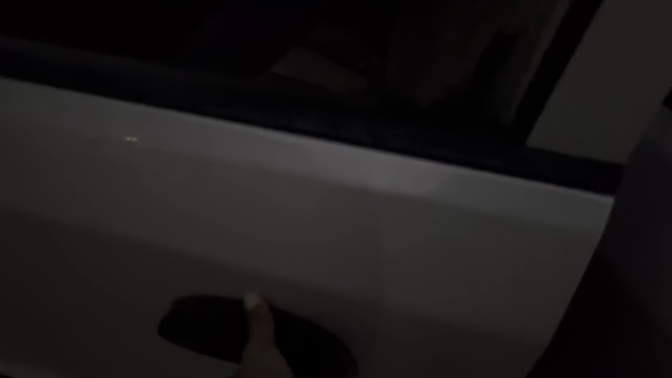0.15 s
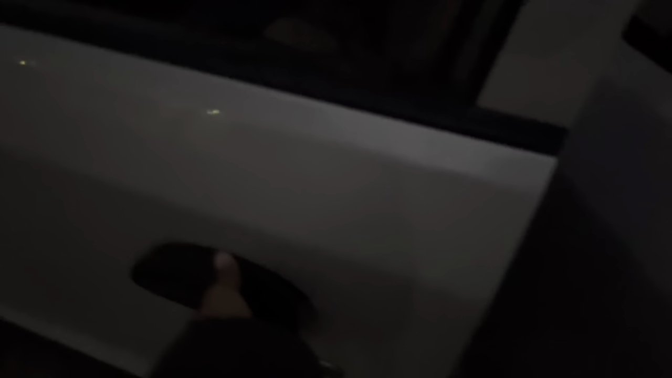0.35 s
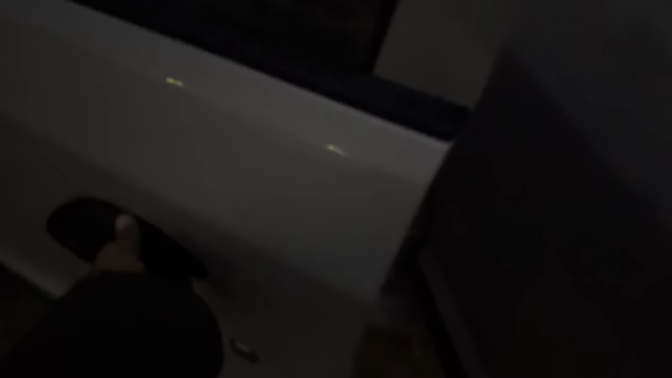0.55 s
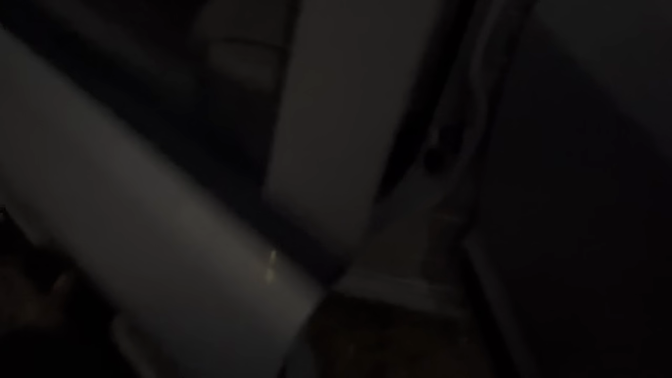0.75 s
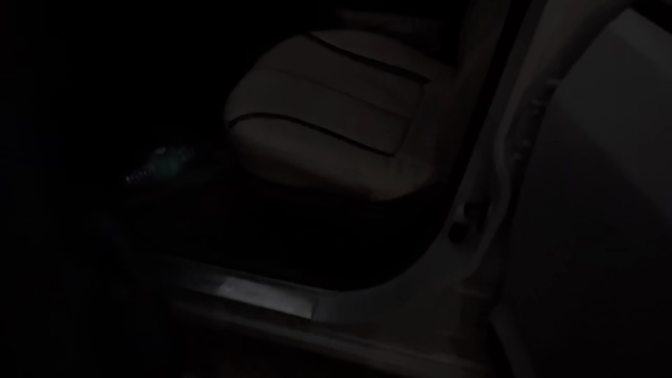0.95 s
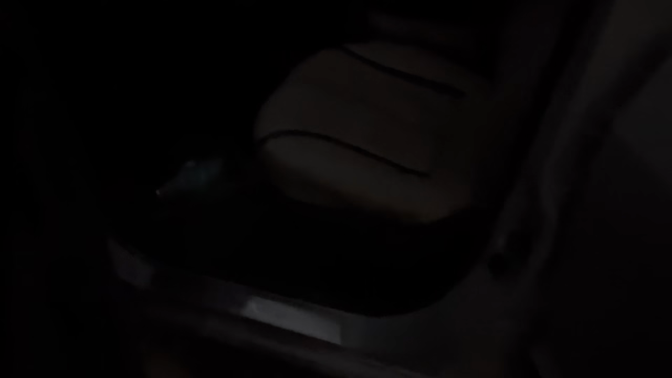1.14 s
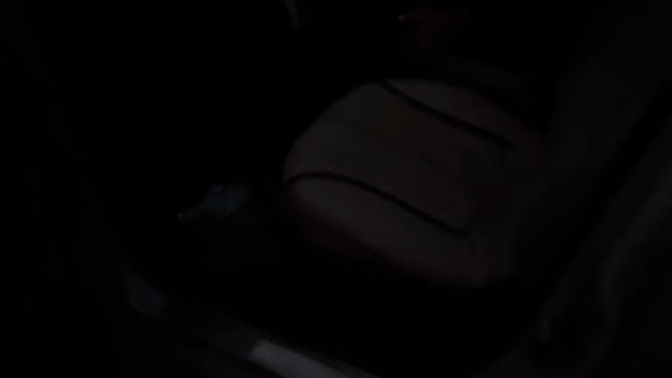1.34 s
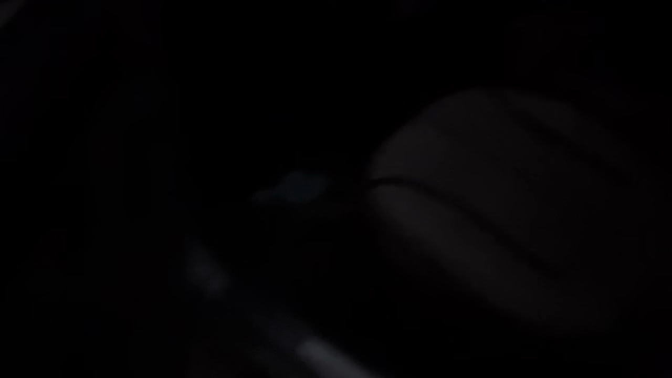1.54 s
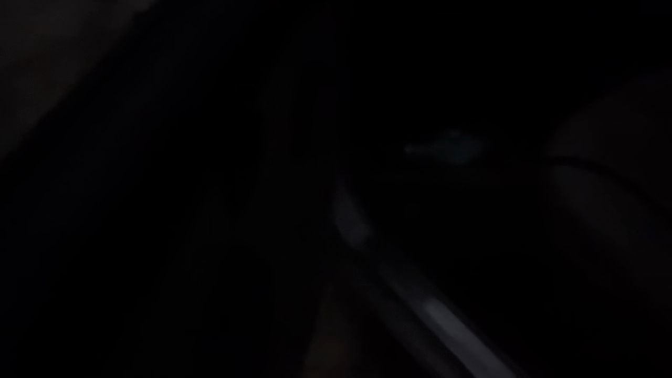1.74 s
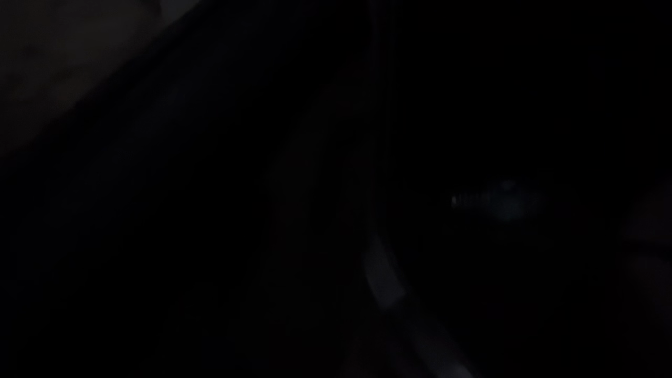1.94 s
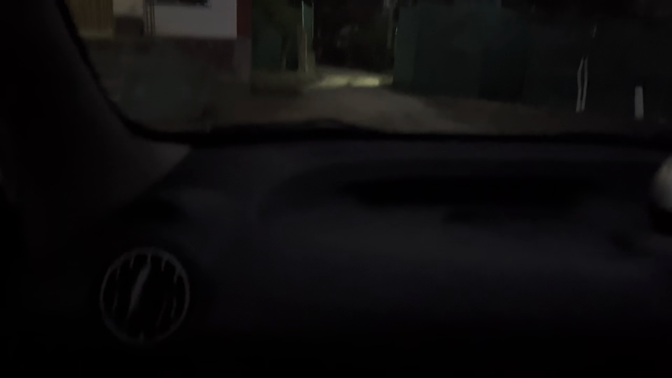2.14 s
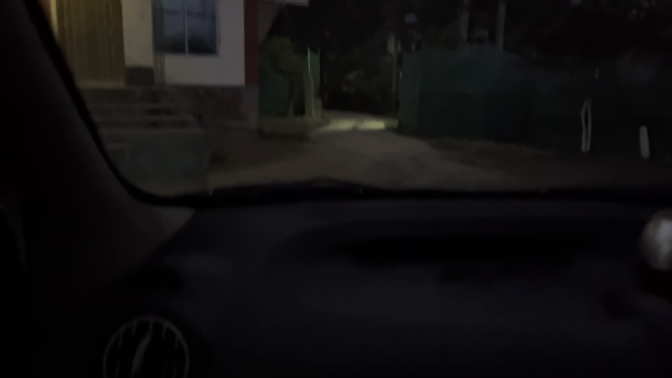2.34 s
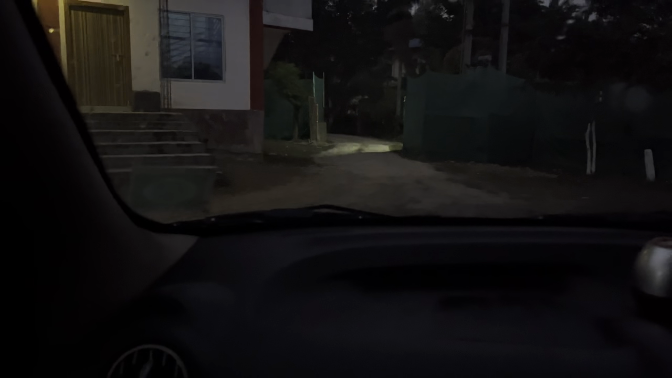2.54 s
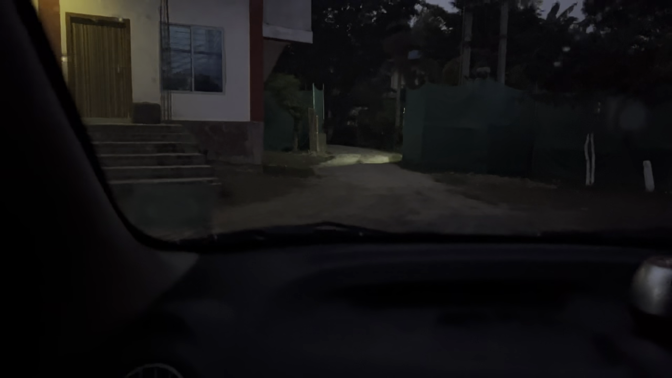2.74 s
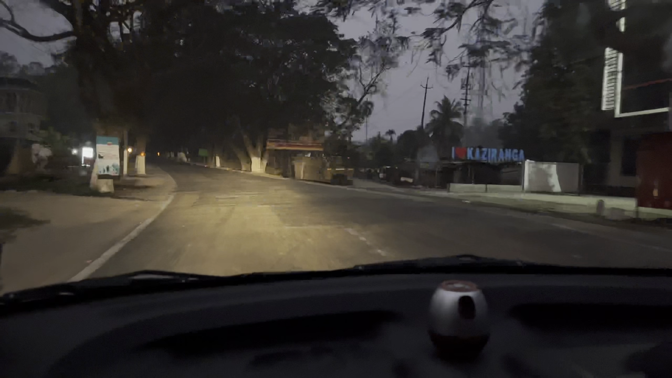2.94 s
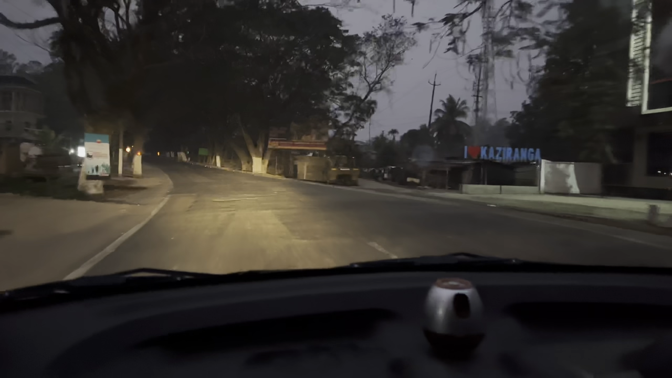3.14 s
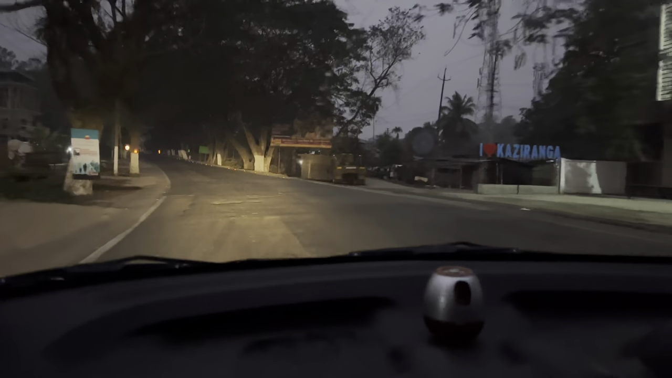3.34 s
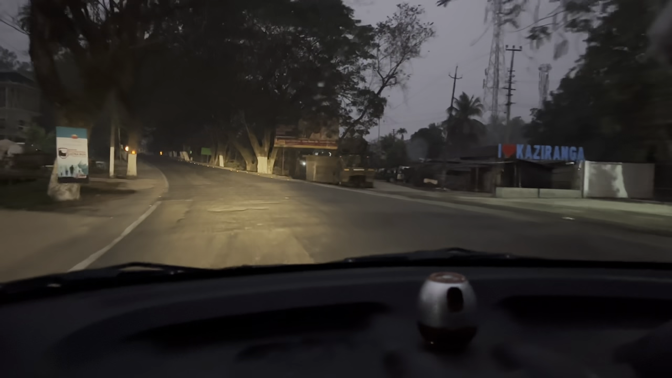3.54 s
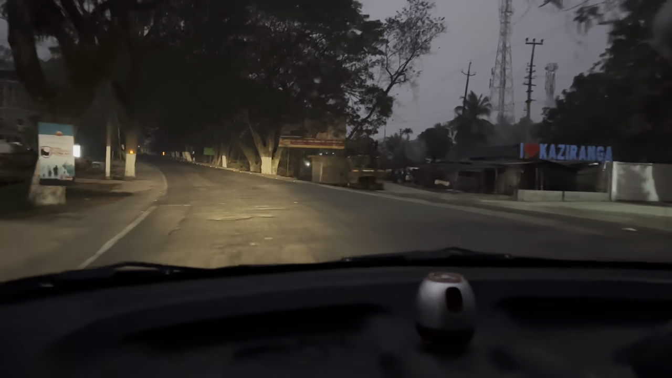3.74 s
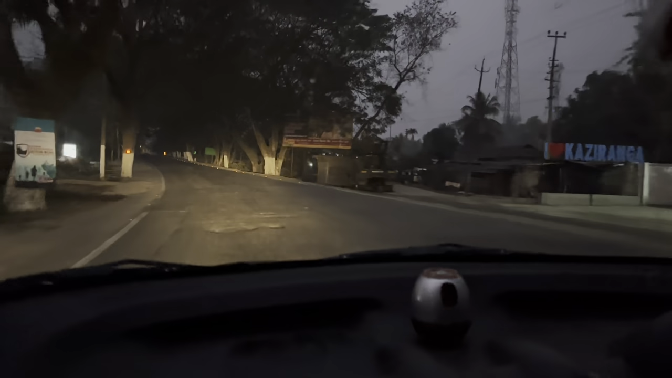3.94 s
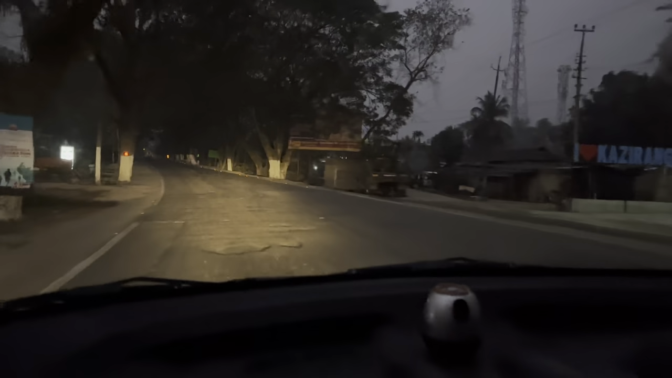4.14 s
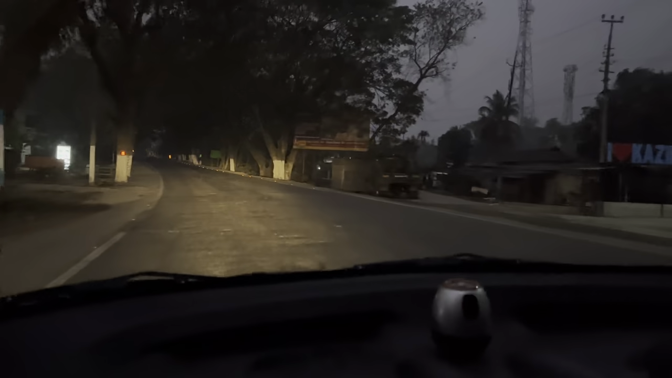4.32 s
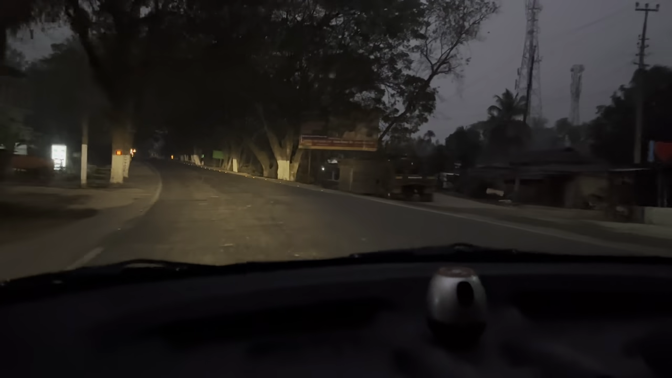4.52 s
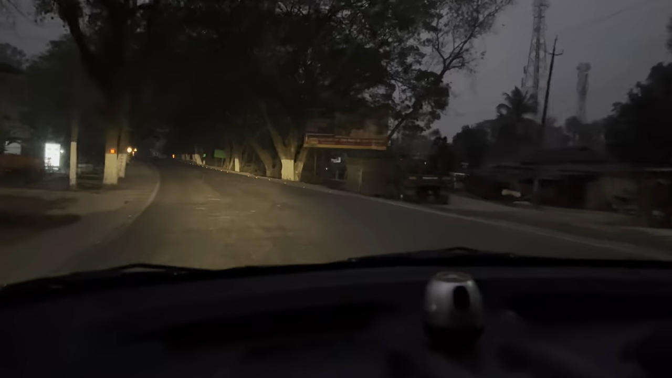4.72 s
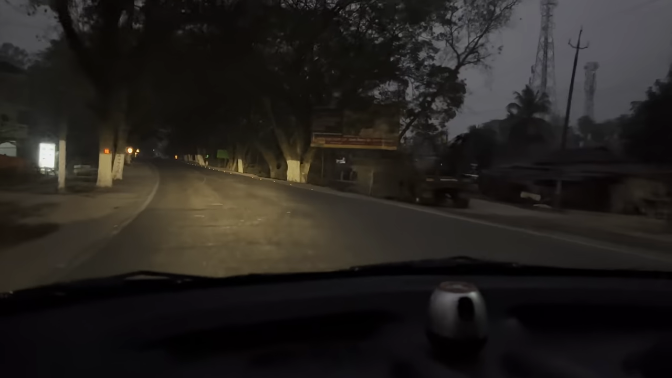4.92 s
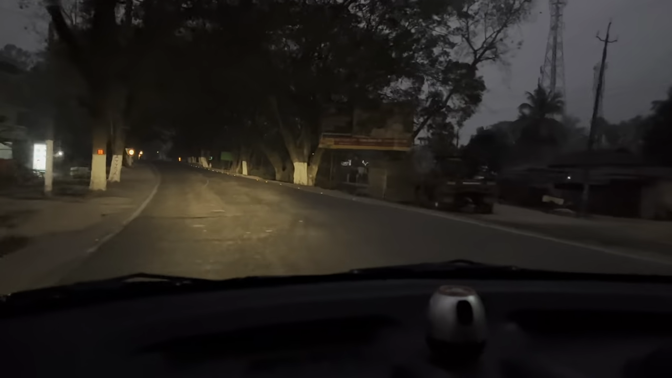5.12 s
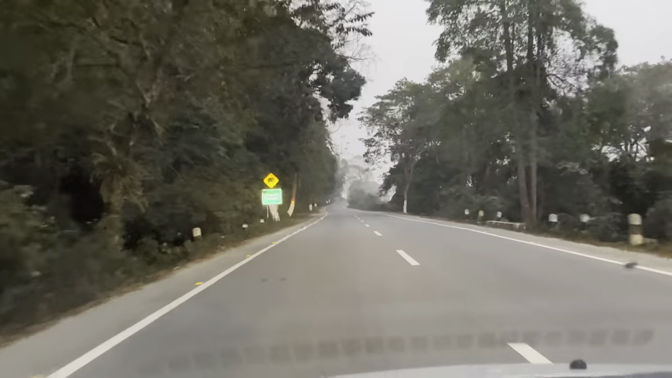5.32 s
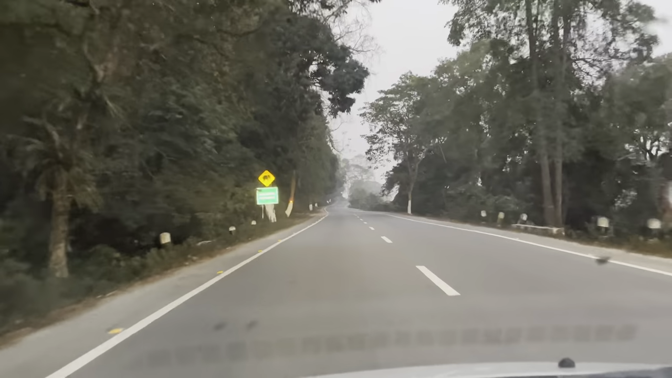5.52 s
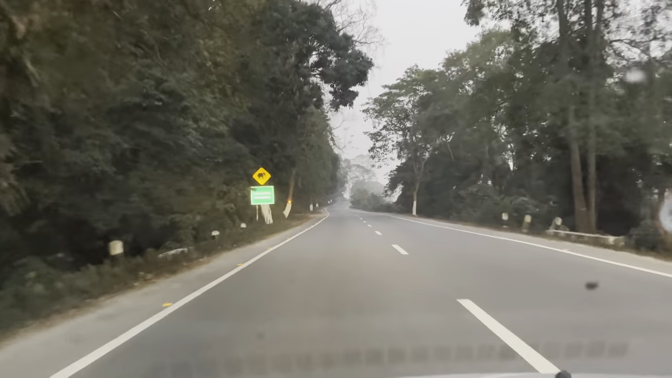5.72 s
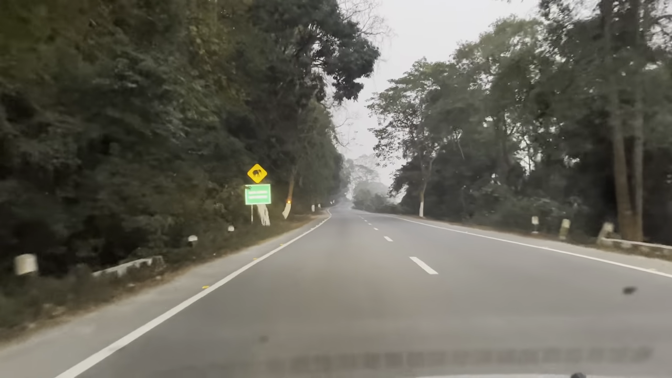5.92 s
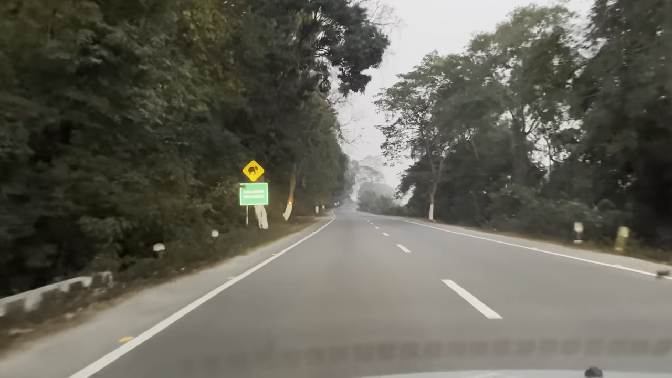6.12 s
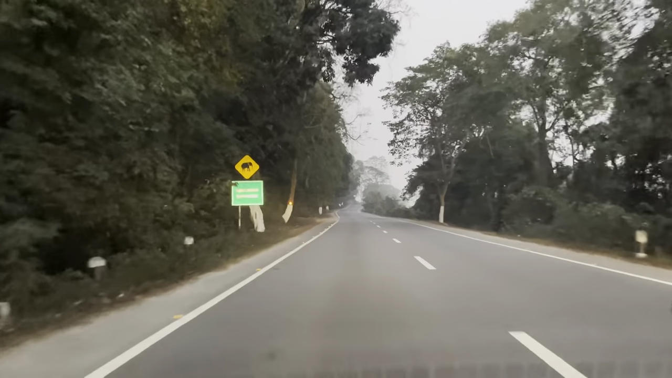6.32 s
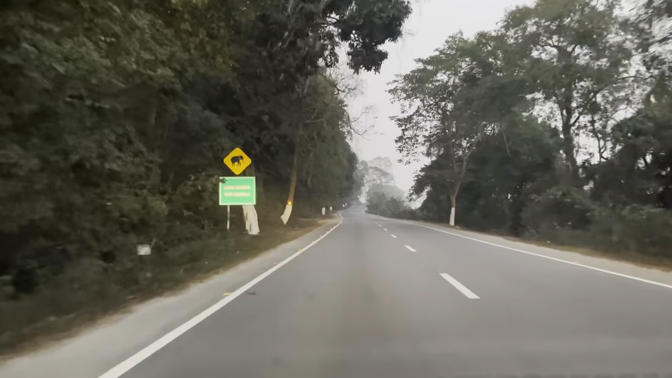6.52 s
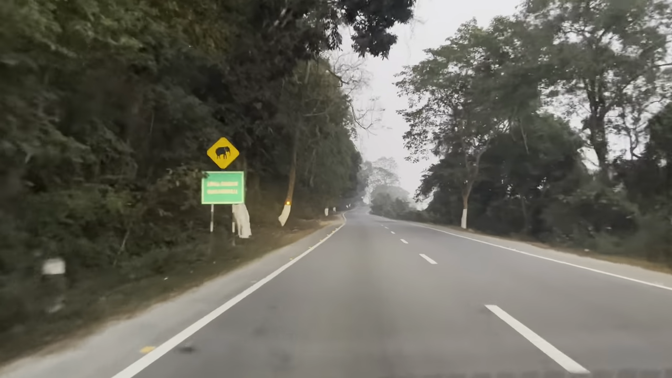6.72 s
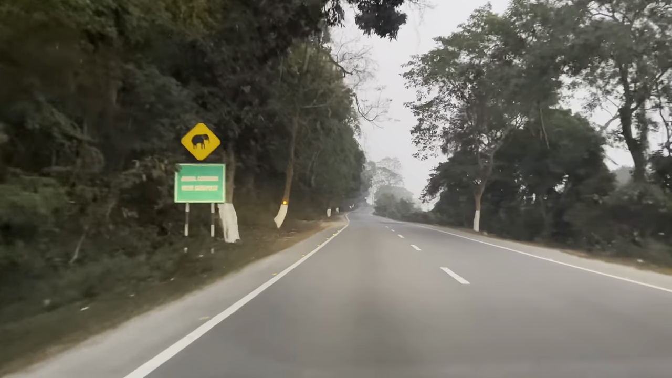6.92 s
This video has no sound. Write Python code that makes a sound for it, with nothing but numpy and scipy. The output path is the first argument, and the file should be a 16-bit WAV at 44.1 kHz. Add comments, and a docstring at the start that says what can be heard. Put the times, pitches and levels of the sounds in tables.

```python
"""Beside a parked car, then in its cabin: a handle is pulled, the latch lets go and a door bangs.
Someone drops into the seat amid rustling cloth and the door slams close on the left.
From inside, the car then rumbles over a patched road, its trim rattling on the bumps;
after an abrupt change it cruises faster, with more tyre roar and wind.
Blows ring tuned modes and noise bands; cloth, tyres and air are coloured noise; the engine is sines."""
import sys
import numpy as np
from scipy import signal
from scipy.fft import rfft, irfft, next_fast_len
from scipy.io import wavfile
from scipy.ndimage import uniform_filter1d

SR = 44100
rng = np.random.default_rng(int(sys.argv[2]) if len(sys.argv) > 2 else 0)


def generate_wav(sig):
    """Save sig (samples, or channels by samples) to the path in sys.argv[1] as 16-bit PCM at SR."""
    pcm = np.round(np.clip(np.atleast_2d(sig).T, -1, 1) * 32767).astype(np.int16)
    wavfile.write(sys.argv[1], SR, pcm)


N = 307068
DRIVE_S, HIGHWAY_S = 2.964, 5.271   # where the patched road and the highway begin
TIME = np.arange(N) / SR
PADDED = next_fast_len(N, real=True)
BINS = np.maximum(np.arange(PADDED // 2 + 1) * SR / PADDED, 1)   # Hz

# Spread over the microphone's two ports. Each row: frequency in Hz, side minus mid in dB.
WIDTH = [(40, -21.5), (70, -22), (125, -11), (250, -9), (500, -1.5), (1000, -0.5), (2000, 0.5), (4000, 0),
         (12000, -3.5)]
# Balance of the two ports. Each row: frequency in Hz, left minus right in dB.
LEFT_DB = [(50, -1.5), (250, 1.5), (500, 1.5), (1000, 2.5), (2000, -1.5), (4000, 4), (8000, 0.1)]
# Colour of roar and hiss on the patched road. Each row: frequency in Hz, relative density in dB per Hz.
PATCHED_HIGH = [(88, -34.5), (150, 3.5), (204, -10.5), (243, -11), (364, -14.5), (515, -26), (787, -30),
                (1320, -32), (1670, -40), (1910, -37.5), (3090, -45), (3340, -46.5), (8410, -65.5),
                (12600, -64), (15000, -87.5)]
# Tyre roar, then wind hiss, on the patched road.
# Each row: level at its start in dB, gain in dB per second, share of the roughness (ratio).
PATCHED_LAYERS = [(-32, .5, 0.31), (-59.5, 1.5, 0.29)]


def from_db(db):
    """Decibels to gain."""
    return 10 ** (np.asarray(db) / 20)


def rms(x):
    """Root mean square."""
    return np.sqrt(np.mean(x ** 2) + 1e-20)


def in_time(rows):
    """Each column of a curve at every sample."""
    s, *columns = np.transpose(rows)
    return [np.interp(TIME, s, c) for c in columns]


def at_hz(points, hz):
    """Read a table along log frequency."""
    f, value = np.transpose(points)
    return np.interp(np.log(hz), np.log(f), value)


def after(s, fade):
    """Goes from 0 to 1 around time s."""
    return np.clip((TIME - s) / fade + .5, 0, 1)


def drift(rate):
    """Slow chance with rms 1, weak above the rate in Hz."""
    slow = irfft(rfft(rng.standard_normal(PADDED)) / (1 + (BINS / rate) ** 2), PADDED)[:N]
    return slow / rms(slow)


def swells(rows, still_db):
    """Bell-shaped swells (middle s, half length s, dB) over a steady background, as a gain."""
    bells = sum(from_db(db) ** 2 * np.exp(-((TIME - s) / half) ** 2) for s, half, db in rows)
    return np.sqrt(from_db(still_db) ** 2 + bells)


def below(hz):
    """Gain of a steep low-pass."""
    return 1 / np.sqrt(1 + (BINS / hz) ** 10)


def above(hz):
    """Gain of the matching high-pass."""
    return np.sqrt(1 - below(hz) ** 2)


def resonant(peaks):
    """Gain of a few resonances (Hz, width Hz, dB) along frequency."""
    return from_db(sum(db / (1 + (2 * (BINS - hz) / width) ** 2) for hz, width, db in peaks))


def ports(mid, side, hz, width=WIDTH, left_db=LEFT_DB):
    """Left and right share the mid; the side spreads them apart by frequency."""
    side = side * from_db(at_hz(width, hz))
    lean = from_db(at_hz(left_db, hz) / 2)
    return np.array([(mid + side) * lean, (mid - side) / lean])


def coloured(spectrum, band, shape, width, left_db):
    """Stereo noise of a given colour, its mid scaled to rms 1 inside the band."""
    mid, side = rfft(rng.standard_normal((2, PADDED))) * from_db(at_hz(spectrum, BINS)) * shape
    inside = irfft(mid * (BINS > band[0]) * (BINS < band[1]), PADDED)
    return irfft(ports(mid, side, BINS, width, left_db), PADDED)[:, :N] / rms(inside)


def noise(spectrum, band, shape=1):
    """Coloured noise with the general spread of the two ports."""
    return coloured(spectrum, band, shape, WIDTH, LEFT_DB)


def wall_ripple():
    """Reflections between the windows leave fine peaks and dips, as a gain for mid and side."""
    ripple_db, spacing_hz = 2.34, 70   # the ripple deepens towards the treble
    knots = np.arange(0, SR / 2, spacing_hz)
    heights = np.clip(rng.standard_normal((2000, 2))[:len(knots)], -2, 2).T
    curves = np.array([np.interp(BINS, knots, h) for h in heights])
    return from_db(ripple_db * BINS / (BINS + 400) * curves)


def road_noise(spectrum, band, shape=1):
    """Coloured noise as it fills the cabin, rippled by reflections."""
    # Spread of the road over the ports. Each row: frequency in Hz, side minus mid in dB.
    road_width = [(40, -23), (70, -22.5), (125, -14), (250, -6.5), (480, -0.5), (620, 1), (770, 0),
                  (1000, 1), (1400, 7), (2100, 0), (3000, 0.5), (4500, -1), (7000, -1.5), (8500, 4.5),
                  (11500, -10.5)]
    # Its balance. Each row: frequency in Hz, left minus right in dB.
    road_left_db = [(80, 0), (230, 3.5), (430, 0), (780, 1.5), (920, 2), (1250, .5), (2000, -0.1),
                    (3300, .5), (5200, 6), (7000, .5), (9500, -2), (12000, 0)]
    return coloured(spectrum, band, shape * wall_ripple(), road_width, road_left_db)


def clicks(times, sizes, size=N):
    """One impulse for each event."""
    out = np.full(size, 1e-18)
    np.add.at(out, np.clip(np.round(times * SR).astype(int), 0, size - 1), sizes)
    return out


def smooth(x, seconds):
    """One-pole lag."""
    r = np.exp(-1 / (seconds * SR))
    return signal.lfilter([1 - r], [1, -r], x)


def ring(x, hz, t60):
    """A unit click sets a decaying sine of starting height about 1 ringing."""
    r, w = from_db(-60 / (t60 * SR)), 2 * np.pi * hz / SR
    return signal.lfilter([0, np.sin(w)], [1, -2 * r * np.cos(w), r * r], x)


def uneven(db, spread_db):
    """Strengths for mid and side, each scattered in level and pushing either way."""
    shape = (len(db), 2)
    return from_db(db + rng.normal(0, spread_db, shape).T) * rng.choice([-1, 1], shape).T


def snaps(rows, modes, count, bounce_s, loss_db):
    """A small stiff part is struck and bounces; each touch rings its modes with new strengths."""
    s, db = np.transpose(rows)
    touch = np.arange(count)
    times = (s[:, None] + bounce_s * touch * rng.uniform(.7, 1.3, (len(s), count))).ravel()
    db = (db[:, None] - loss_db * touch).ravel()
    out = 0
    for hz, level, t60 in modes:
        blows = np.array([clicks(times, size) for size in uneven(db + level, 0.97)])
        out = out + ports(*ring(blows, hz, t60), hz)
    return out


def strength(contacts, hz):
    """How hard each contact drives one frequency, in dB: between its panel, clack and tick levels."""
    hardness = 0.37   # this share of the gap from clack to tick lifts or lowers the very top
    s, tick, clack, panel = np.transpose(contacts)
    top = tick + hardness * np.clip(tick - clack, -20, 20)
    log_hz = np.log([300, 1000, 4500, 12000])
    return np.array([np.interp(np.log(hz), log_hz, row) for row in zip(panel, clack, tick, top)])


def struck(contacts, modes, colour, modes_db, length, rise_s, tail_db, tail_tilt_db, tail_length, grain_db):
    """Contacts ring a body's main modes, and its crowded ones as noise bands whose lows rise later."""
    # How fast a contact dies, before the body's length factor. Each row: frequency in Hz, t60 in seconds.
    contact_decay = [(100, 0.64), (400, 0.26), (1000, 0.13), (3000, 0.12), (7000, 0.032), (14000, 0.062)]
    times = np.array(contacts)[:, 0]
    start = max(int(times.min() * SR), 0)
    size = min(int((times.max() + .7) * SR), N) - start
    times, span = times - start / SR, slice(start, start + size)
    white = rng.standard_normal((2, 2, N))[..., span]
    chatter = grain_db * drift(300)[span]   # small loose parts touch again and again
    out, edges = np.zeros((2, N)), np.geomspace(90, 16000, 16)   # about half-octave bands
    for k, (low, high) in enumerate(zip(edges, edges[1:])):
        hz = np.sqrt(low * high)
        band_filter = signal.butter(2, [low, high], "band", fs=SR, output="sos")
        band = signal.sosfilt(band_filter, white[k % 2])
        power = clicks(times, from_db(strength(contacts, hz) + at_hz(colour, hz)) ** 2, size)
        t60 = length * at_hz(contact_decay, hz)
        direct, tail = (signal.lfilter([1], [1, -from_db(-120 / (t * SR))], power)
                        for t in (t60, t60 * tail_length))
        wet = from_db(tail_db + tail_tilt_db * np.log2(hz / edges[0]))   # tilt in dB per octave
        swell = smooth(np.sqrt(direct + wet ** 2 * tail), rise_s + 0.22 / hz)
        grain = from_db(chatter * hz / (hz + 900))   # strongest in the upper bands
        out[:, span] += grain * swell * ports(*band / rms(band), hz)
    for hz, db, t60 in modes:
        chance = from_db(rng.normal(0, 2.9, (len(times), 2)))
        chance[:, 1] *= rng.choice([-1, 1], len(times))   # blows push the same way, but lean to either side
        level = from_db(strength(contacts, hz) + db + modes_db)
        blows = np.array([clicks(times, level * c, size) for c in chance.T])
        blows = smooth(blows, 1 / (2 * np.pi * hz))   # contact rounds the attack
        out[:, span] += ports(*ring(blows, hz, t60), hz) * np.sqrt(2)
    return out


def from_the_left(x, lag_s, direct_db, diffuse_db):
    """A source close on one side: the far port hears it a little later, mixed with reflections."""
    left, right = x
    late = np.interp(TIME - lag_s, TIME, left)
    return np.array([left, from_db(direct_db) * late + from_db(diffuse_db) * right])


def parked(grain_db=0.9, crease_db=-7.0, creases_per_s=220, crease_size_db=4.0):
    """Low outdoor murmur and the rustle of getting in: cloth slides, and its creases crackle."""
    # Colours of the outdoors and of cloth. Each row: frequency in Hz, relative density in dB per Hz.
    outdoors = [(26, -37), (45, 8), (97, -0.5), (129, 7.5), (171, -8.5), (216, -1.5), (331, -8),
                (401, -10.5), (437, -12), (911, -26.5), (1500, -27.5), (1950, -49), (3300, -120)]
    clothes = [(290, -20), (500, 14.5), (522, -10), (648, -0.5), (1040, 0), (1450, -2), (1600, -3),
               (2760, -4.5), (6090, -8), (8000, -14), (13400, -15.5), (14600, -24), (15500, -38)]
    # Movements, each a swell of cloth and pushed air.
    # Each row: middle in seconds, half length in seconds, rustle in dB, low rush in dB.
    moves = [(0.0, 0.043, -55, -46), (0.632, 0.26, -64, -66), (0.829, 0.022, -49.5, -48),
             (1.003, 0.24, -61.5, -45.5), (1.332, 0.05, -55, -49), (1.515, 0.068, -54.5, -50),
             (1.682, 0.038, -71, -42), (2.102, 0.21, -53.5, -41), (2.591, 0.063, -51.5, -34),
             (2.93, 0.061, -53.5, -50)]
    # Resonances heard in the rustling cloth. Each row: frequency in Hz, width in Hz, height in dB.
    rustle_peaks = [(1064, 150, 0), (2840, 400, 2), (5100, 600, 2.5), (6530, 760, 3.5)]
    still_rustle_db, still_murmur_db = -62, -51   # between movements
    low = swells([(s, half, rush) for s, half, cloth, rush in moves], still_murmur_db)
    outside = low * noise(outdoors, (40, 400), below(987))
    strokes = [(s, half, cloth) for s, half, cloth, rush in moves]
    colour = above(610) * resonant(rustle_peaks)
    grain = from_db(grain_db * drift(43))
    sliding = swells(strokes, still_rustle_db) * grain * noise(clothes, (2000, 12000), colour)
    sizes = from_db(crease_size_db * np.minimum(rng.exponential(1, N), 4))
    creases = smooth((rng.random(N) < creases_per_s / SR) * sizes, 0.0014)
    moving = from_db(crease_db) * swells(strokes, -np.inf)
    crackle = moving * creases / rms(creases) * noise(clothes, (2000, 12000), colour)
    return outside + sliding + crackle


def tread():
    """The tread sings over different tarmac: bands of brighter noise swell and fade."""
    # Each row: middle in seconds, half length in seconds, level in dB.
    tread_swells = [(5.93, 0.042, -41), (6.19, 0.1, -41.5), (6.8, 0.12, -44)]
    # Colour of the singing. Each row: frequency in Hz, relative density in dB per Hz.
    tread_colour = [(900, -60), (1350, -9), (1550, 4), (1950, 3), (2350, -15), (2700, -20), (3800, -60)]
    return swells(tread_swells, -np.inf) * road_noise(tread_colour, (1300, 2600))


def booms():
    """Long undulations of the road shake the body panels at their resonance."""
    # Each row: middle in seconds, half length in seconds, level in dB.
    undulations = [(4.13, 0.2, -24), (4.42, 0.062, -20.5), (6.93, 0.046, -21)]
    boom_hz, boom_width_hz = 132, 31
    resonance = 1 / (1 + (2 * (BINS - boom_hz) / boom_width_hz) ** 2)
    return swells(undulations, -np.inf) * noise(PATCHED_HIGH, (100, 200), resonance)


def engine(curve, orders, shake, unsteady_db, wander):
    """Low orders of the engine drone through the bulkhead and throb with the body."""
    firing_hz, db = in_time(curve)
    db = db + in_time(shake)[0]
    phase = 2 * np.pi * np.cumsum(firing_hz * (1 + wander * drift(1.7))) / SR
    return sum(np.sqrt(2) * from_db(db + level + unsteady_db * drift(4.1)) * np.sin(k * phase)
               for k, level in orders)


def roughness():
    """Roughness under the wheels in dB at every sample, held after its last point."""
    # Each row: time in seconds, roughness in dB before a layer takes its share.
    rough_road = [(3.1, .5), (3.4, 1), (3.6, 0), (3.92, 1.5), (4.0, 1), (4.5, 11), (4.86, -1.5), (4.94, 13),
                  (5.06, -1), (5.19, 16), (5.26, 12)]
    return in_time(rough_road)[0]


def road_levels(layers, start_s):
    """Levels of roar and hiss in dB: each climbs with speed and follows the roughness of the road."""
    return [db + db_per_s * (TIME - start_s) + share * roughness() for db, db_per_s, share in layers]


def road(layers, shake, start_s, low_colour, high_colour, rumble_db, coarse_db, lumpy_db, evenness):
    """Suspension shakes the body, tyres surge over the grain of the tarmac, air hisses along the glass."""
    # Resonances heard in the roar. Each row: frequency in Hz, width in Hz, height in dB.
    roar_peaks = [(199, 35, 1.5), (287, 35, 2), (420, 52, 0), (860, 110, 1.5), (1677, 37, 4),
                  (2260, 250, 0.5), (6870, 710, 3.5)]
    onset_s = 0.023   # the noise swells in over this time
    roar, hiss = road_levels(layers, start_s)
    body = road_noise(low_colour, (25, 120), below(160))
    swell = np.sqrt(uniform_filter1d(body[0] ** 2, SR // 12) + 1e-9)
    body = body * (rms(body) / swell) ** evenness   # the bumps, more than chance, set its swells
    body = from_db(in_time(shake)[0] + rumble_db) * body
    peaks = resonant(roar_peaks)
    tyres = road_noise(high_colour, (150, 1000), peaks * above(160) * below(1800))
    tyres = tyres * from_db(roar + lumpy_db * drift(6.7))
    air = from_db(hiss) * road_noise(high_colour, (2000, 12000), peaks * above(1800))
    tarmac = from_db(coarse_db * drift(41))
    return after(start_s + onset_s / 2, onset_s) * (body + tarmac * (tyres + air))


def highway():
    """The faster cruise: road, engine and singing tread."""
    # Colours of rumble, then of roar and hiss. Each row: frequency in Hz, relative density in dB per Hz.
    low_colour = [(13, -40), (22, -9), (38, -5), (60, 2), (73, -0.5), (98, -9), (193, -14), (232, -19),
                  (275, 6), (314, 5), (400, -24), (520, -54), (880, -120)]
    high_colour = [(88, -28), (150, 6.5), (273, -6.5), (312, -8.5), (468, -11.5), (515, -16), (833, -17),
                   (1030, -21.5), (2270, -29.5), (3210, -37.5), (6680, -46), (7940, -52.5), (11700, -53),
                   (13900, -61.5), (15000, -76)]
    # Roar, then hiss. Each row: level at its start in dB, gain in dB per second, share of the roughness (ratio).
    layers = [(-25, 1.63, 0), (-45, 1.55, 0.0055)]
    # How hard the suspension shakes the body. Each row: time in seconds, level in dB.
    shake = [(5.3, -17), (5.66, -16), (5.724, -21.5), (5.764, -14.5), (5.944, -19), (5.976, -11),
             (6.034, -16.5), (6.08, -15), (6.226, -23), (6.262, -14), (6.642, -17.5), (6.684, -21.5),
             (6.72, -11.5), (6.94, -17)]
    # Each row: time in seconds, nominal firings per second, level against the shake in dB.
    curve = [(5.27, 50.97, -8), (5.9, 50.73, -5), (6.4, 51.34, -8), (6.96, 51.4, -6.5)]
    # Each row: multiple of the firing rate, level in dB.
    orders = [(1, 0), (4 / 3, -6.5), (2.7, -13), (8 / 3, -12), (3.7, -17)]
    ride = road(layers, shake, HIGHWAY_S, low_colour, high_colour,
                rumble_db=-0.14, coarse_db=0.7, lumpy_db=0.83, evenness=0.93)
    drone = engine(curve, orders, shake, unsteady_db=2.5, wander=0.0083)
    return ride + drone + tread()


def rattles(count=22, tick_db=5.5, clack_db=6.5, panel_db=10.0):
    """Plastic trim buzzes on bumps and ticks faintly at random, more often as the car gains speed."""
    # Bumps. Each row: start in seconds, then tick, clack and panel drive in dB.
    bumps = [(3.965, -42, -37.5, -40.5), (4.482, -37, -43, -35), (4.4995, -38, -36, -33),
             (4.52, -45, -41, -38), (4.5344, -34.5, -30, -36), (4.7588, -37.5, -35, -30),
             (4.783, -36.5, -43, -35), (4.831, -43, -52, -37), (4.8916, -36.5, -47, -24),
             (4.918, -35, -41, -20), (4.936, -38, -47, -11), (4.95, -40, -50, -20), (4.972, -36, -40, -33),
             (4.987, -32, -33, -29), (5.002, -32, -28, -36), (5.025, -33.5, -52, -43),
             (5.0807, -32.5, -36, -20.5), (5.124, -31.5, -38, -17), (5.15, -39, -44, -21),
             (5.176, -31, -30, -24), (5.19, -26, -35, -20), (5.205, -25.5, -21.5, -25),
             (5.243, -20.5, -28, -36), (5.251, -17.5, -30, -13.5)]
    # Each row: frequency in Hz, level in dB, t60 in seconds.
    modes = [(315, 0.5, 0.045), (915, 0.5, 0.042), (1610, -1, 0.018), (2640, -8, 0.054),
             (3060, -4.5, 0.008), (4130, -4.5, 0.015)]
    # Crowded upper modes. Each row: frequency in Hz, band level in dB.
    colour = [(100, -13), (350, -7.5), (900, -5), (2000, -12), (3300, -10), (4800, -12.5), (6500, -20),
              (8500, -25), (12000, -20.5), (15000, -37)]
    _, hiss = road_levels(PATCHED_LAYERS, DRIVE_S)
    when, how_hard = rng.random((count, 2)).T
    times = DRIVE_S + (HIGHWAY_S - DRIVE_S) * np.sqrt(when)
    db = np.interp(times, TIME, hiss) + 5 * how_hard
    small = np.column_stack([times, db + tick_db, db + clack_db, db + panel_db])
    return struck(np.vstack([bumps, small]), modes, colour, modes_db=-6.0, length=0.57, rise_s=0.0044,
                  tail_db=-22.5, tail_tilt_db=2.0, tail_length=7.2, grain_db=3)


def trim_snaps():
    """A stiff part of the trim snaps on the hardest bumps and bounces once."""
    # Each row: start in seconds, drive in dB.
    hits = [(4.54, -40.5), (5.003, -29.5), (5.13, -43), (5.207, -39), (5.2535, -20)]
    # Each row: frequency in Hz, level in dB, t60 in seconds.
    modes = [(1700, -5, 0.056), (2278, -5, 0.035), (2975, -3.5, 0.04), (3500, -11, 0.024),
             (3940, -2.5, 0.026), (4360, -9, 0.035), (4670, -5.5, 0.029), (4910, -7, 0.048),
             (5200, -9, 0.019)]
    return snaps(hits, modes, count=2, bounce_s=0.001855, loss_db=5.5)


def patched_road():
    """The slower stretch: road, engine and shaken trim."""
    # Colour of the rumble. Each row: frequency in Hz, relative density in dB per Hz.
    low_colour = [(13, -39.5), (22, -13), (36, -4.5), (48, 2.5), (62, 4), (72, -2), (134, -9), (173, -18.5),
                  (205, -6.5), (246, -30), (292, -27.5), (400, -35.5), (520, -62.5), (880, -120)]
    # How hard the suspension shakes the body. Each row: time in seconds, level in dB.
    shake = [(3.0, -18), (3.31, -17.5), (3.43, -25.5), (3.48, -12), (3.55, -26), (3.58, -13.5),
             (3.68, -18.5), (3.71, -13.5), (3.77, -21.5), (4.06, -14.5), (4.59, -11.5), (4.61, -16),
             (4.71, -9.5), (4.81, -19), (4.98, -6), (5.07, -22.5), (5.1, -12), (5.26, -10)]
    # Each row: time in seconds, nominal firings per second, level against the shake in dB.
    curve = [(2.97, 38.8, -9.5), (3.9, 41.7, -10.5), (4.3, 40, -10), (5.27, 42.5, -15.5)]
    # Each row: multiple of the firing rate, level in dB.
    orders = [(1, -5.5), (2, 1.5), (3, -12), (4, -18.5), (5, -16.5)]
    ride = road(PATCHED_LAYERS, shake, DRIVE_S, low_colour, PATCHED_HIGH,
                rumble_db=0.7, coarse_db=1.82, lumpy_db=0.87, evenness=0.76)
    drone = engine(curve, orders, shake, unsteady_db=0.4, wander=0.0036)
    return ride + drone + rattles() + trim_snaps()


def knocks(contact_s=.0001):
    """An elbow, a foot or a bump in the road knocks a hollow plastic panel."""
    # Each row: start in seconds, drive in dB.
    hits = [(1.52, -40.5), (2.164, -41), (2.19, -38.5), (2.249, -37.5), (2.384, -43), (2.654, -25.5),
            (2.727, -48), (2.878, -40), (4.538, -32), (4.937, -22), (4.948, -22.5)]
    # Each row: frequency in Hz, level in dB, t60 in seconds.
    modes = [(385, -6, 0.077), (450, -12.5, 0.019), (588, -3, 0.049), (664, -4, 0.04), (830, -5.5, 0.041),
             (1050, -15, .03)]
    s, db = np.transpose(hits)
    out = 0
    for hz, level, t60 in modes:
        blows = np.array([clicks(s, size) for size in uneven(db + level, 1.3)])
        out = out + ports(*ring(smooth(blows, contact_s), hz, t60), hz)
    return out


def thuds(cushion_s=0.0012):
    """A closing door or a body on the seat sets the cabin booming; seals and foam soften the push."""
    # Blows that pump the cabin air. Each row: start in seconds, drive in dB.
    pushes = [(0.446, -25.5), (1.13, -26), (2.009, -12.5), (2.036, -12), (2.588, -11), (2.61, -19.5),
              (2.622, -11)]
    # Air and shell of the cabin. Each row: frequency in Hz, level in dB, t60 in seconds.
    modes = [(33.45, -9, 0.85), (48.7, -10.5, 0.98), (62.96, 0.5, 0.68), (79.4, -3, 0.31), (123, -2, 0.28),
             (145, -11, 0.86)]
    s, db = np.transpose(pushes)
    push = smooth(smooth(clicks(s, from_db(db)), cushion_s), cushion_s)
    return sum(ring(push, hz, t60) * from_db(level) for hz, level, t60 in modes)


def handle():
    """The handle is pulled and the latch lets go: contacts ring the hollow handle and door skin."""
    # Each row: start in seconds, then tick, clack and panel drive in dB.
    contacts = [(0.0024, -38, -51, -34), (0.0979, -30.5, -40, -39), (0.1185, -35.5, -37.5, -25.5),
                (0.1335, -41, -43, -37), (0.2915, -36, -34, -35), (0.2955, -30.5, -36, -27),
                (0.3875, -47, -38.5, -22.5), (0.4145, -36, -47, -46), (0.4205, -32, -39.5, -26),
                (0.4475, -34, -36, -29)]
    # Each row: frequency in Hz, level in dB, t60 in seconds.
    modes = [(148, -4.5, .35), (213, -4.5, 0.23), (244.4, -3.5, 0.26), (299, 4, 0.094), (417, 4.5, 0.15),
             (578, 1.5, 0.13), (820, -1.5, 0.065), (1018, -0.5, 0.09), (1075, 0, 0.094),
             (1500, -10.5, 0.081), (2070, -4.5, 0.05), (3170, -12, 0.063), (4970, -13, .05)]
    # Crowded upper modes. Each row: frequency in Hz, band level in dB.
    colour = [(100, -8), (180, -12), (400, -10), (700, -11), (1100, -10.5), (2000, -10), (3200, -17.5),
              (4800, -14), (6500, -16), (8500, -21), (12000, -21), (15000, -31)]
    return struck(contacts, modes, colour, modes_db=-7.0, length=0.8, rise_s=0.001,
                  tail_db=-22.0, tail_tilt_db=2.0, tail_length=2.5, grain_db=-1.0)


def latch():
    """The steel latch snaps over, ringing its pawl."""
    # Each row: start in seconds, drive in dB.
    hits = [(0.0985, -33), (1.1137, -23), (2.5765, -17.5), (2.581, -20), (2.6095, -28)]
    # Each row: frequency in Hz, level in dB, t60 in seconds.
    modes = [(3230, -8, 0.043), (3860, -16, 0.015), (6550, -2, 0.023), (7000, -8.5, 0.0202),
             (9630, -4.5, 0.014), (12960, -8, 0.015)]
    return snaps(hits, modes, count=2, bounce_s=.0012, loss_db=13.5)


def door_from_outside():
    """The door swings and another bangs shut; a faint high ring near 2.9 kHz dies away."""
    # Each row: start in seconds, then tick, clack and panel drive in dB.
    contacts = [(0.6493, -55, -53, -66), (0.9179, -48, -61, -39), (1.1132, -13, -30, -30),
                (1.12, -16, -18, -14.5), (1.1285, -21.5, -23.5, -12.5), (1.134, -35, -29, -14.5),
                (1.3015, -40, -37.5, -79)]
    # Each row: frequency in Hz, level in dB, t60 in seconds.
    modes = [(129.1, -4, 0.54), (178.6, 6, 0.21), (205.4, 6.5, 0.123), (264, -8.5, 0.32),
             (359.6, -4.5, 0.3), (412, 6, 0.14), (575, -10, 0.2), (666, -16, .18), (770, 10, .07),
             (842, -5, 0.27), (930, -5, 0.21), (1078, -1, 0.15), (1126, -3, 0.15), (1340, -9, 0.09),
             (2083, -20, 0.11), (2910, -15, 0.15)]
    # Crowded upper modes. Each row: frequency in Hz, band level in dB.
    colour = [(100, -13.5), (180, -16.5), (400, -12.5), (700, -8), (1100, -4.5), (2000, -10.5), (3200, -11),
              (4800, -11), (6500, -13), (8500, -14.5), (12000, -20), (15000, -37)]
    # Each row: start in seconds, drive in dB.
    ring_hits = [(1.1205, -50)]
    # Each row: frequency in Hz, level in dB, t60 in seconds.
    ring_modes = [(2815, -3, 0.99), (2885, -3, 0.64), (2950, -5, .75)]
    door = struck(contacts, modes, colour, modes_db=-8.5, length=0.82, rise_s=0.00094,
                  tail_db=-26.5, tail_tilt_db=2.0, tail_length=2.7, grain_db=-1.0)
    faint_ring = snaps(ring_hits, ring_modes, count=1, bounce_s=0, loss_db=0)
    return from_the_left(door, lag_s=0.000454, direct_db=-8.5, diffuse_db=-2) + faint_ring


def door_from_inside(ping_s=2.594, ping_hz=382, ping_db=-43, ping_t60=1.75):
    """The drop into the seat and the slam; one metal part sings on and loose bits settle."""
    # Each row: start in seconds, then tick, clack and panel drive in dB.
    contacts = [(2.012, -37, -40, -16.5), (2.027, -32, -35.5, -22), (2.0441, -33, -34, -21.5),
                (2.5615, -22.5, -9.5, -24), (2.567, -26, -22, -21), (2.576, -6.5, -18, -14.5),
                (2.5804, -14, -18, -18), (2.5855, -20, -20, -14.5), (2.5935, -14.5, -26, -21),
                (2.6085, -15, -25, -13.5), (2.622, -27, -30, -23), (2.641, -41, -27, -28),
                (2.664, -50, -44, -25.5), (2.724, -58, -52, -28)]
    # Each row: frequency in Hz, level in dB, t60 in seconds.
    modes = [(165.8, 0, 0.31), (255, -7, 0.17), (315, -6, 0.2), (577, -15, 0.072), (657, 0, 0.11),
             (1026, 4, 0.07), (1170, -4, 0.051), (1314, -3, .07), (1465, 2, 0.061), (1620, -1.5, 0.079),
             (2390, -8, 0.16), (2700, -4, 0.076), (2840, -14, 0.07), (2940, -12, 0.12), (3350, -17, 0.081),
             (4500, -17, 0.064), (6200, -6, .035), (6520, -1.5, 0.018)]
    # Crowded upper modes. Each row: frequency in Hz, band level in dB.
    colour = [(100, -3), (180, -12.5), (400, -15.5), (700, -12), (1100, -5), (2000, -7.5), (3200, -20),
              (4800, -14.5), (6500, -24), (8500, -24.5), (12000, -19.5), (15000, -52)]
    # Loose bits in the door. Each row: start in seconds, drive in dB.
    settles = [(2.646, -36), (2.6895, -48), (2.7105, -44), (2.7635, -50)]
    # Each row: frequency in Hz, level in dB, t60 in seconds.
    settle_modes = [(3130, -5, 0.021), (3800, -11, .025), (4450, -7, 0.027), (5250, -2, .025),
                    (6600, -9, .02)]
    door = struck(contacts, modes, colour, modes_db=-9.5, length=0.69, rise_s=0.0008,
                  tail_db=-20.5, tail_tilt_db=1.7, tail_length=2.5, grain_db=2.8)
    door = from_the_left(door, lag_s=.00026, direct_db=-3.5, diffuse_db=-3)
    settling = snaps(settles, settle_modes, count=2, bounce_s=.002, loss_db=9)
    ping = ring(clicks(np.array([ping_s]), from_db(ping_db)), ping_hz, ping_t60)
    return door + settling + ping


def scene():
    """Parked, patched road and highway follow one another."""
    moving, fast = after(DRIVE_S, 0.008), after(HIGHWAY_S, 0.014)
    driving = (1 - fast) * patched_road() + fast * highway() + booms()
    doors = handle() + latch() + door_from_outside() + door_from_inside()
    getting_in = parked() + thuds() + doors
    return (1 - moving) * getting_in + moving * driving + knocks()


def record(dry):
    """The microphone drops the deepest bass, peaks are rounded, the top is cut."""
    bass_hz, cutoff_hz = 28, 15200
    x = signal.sosfilt(signal.butter(6, bass_hz, "high", fs=SR, output="sos"), dry)
    x = x / (1 + (x / .95) ** 6) ** (1 / 6)
    return signal.sosfilt(signal.ellip(10, .1, 80, cutoff_hz, fs=SR, output="sos"), x)


dry = scene()
out = record(dry)
generate_wav(out)
```